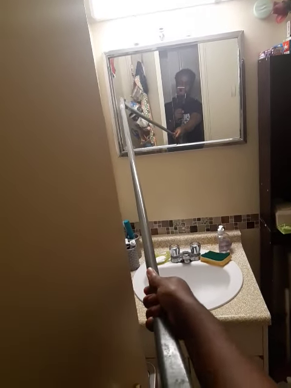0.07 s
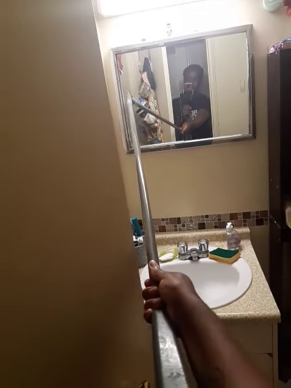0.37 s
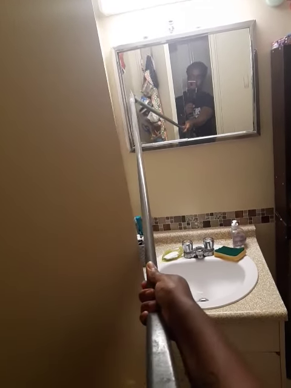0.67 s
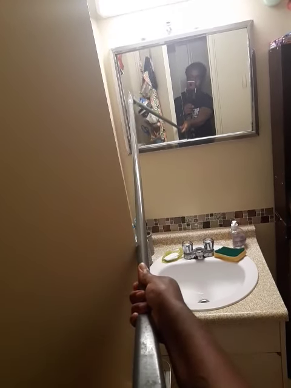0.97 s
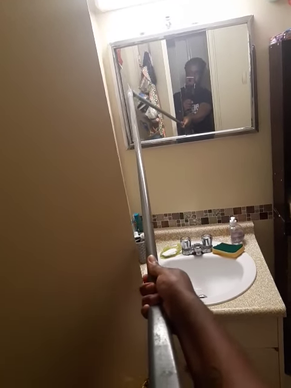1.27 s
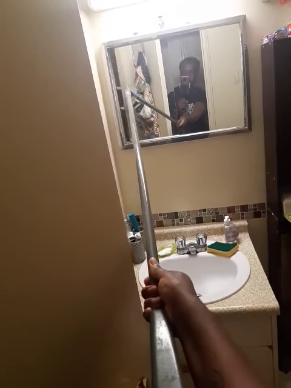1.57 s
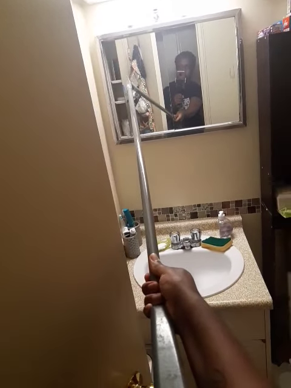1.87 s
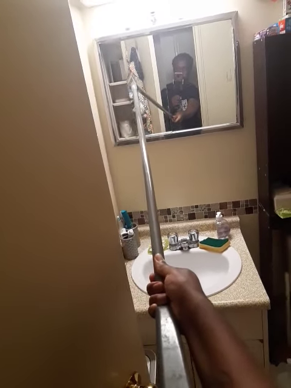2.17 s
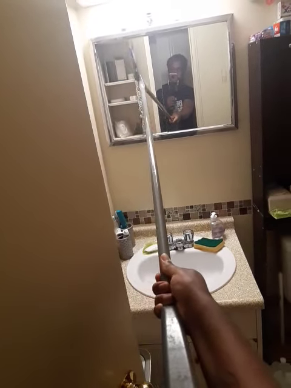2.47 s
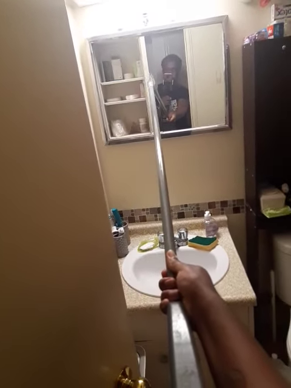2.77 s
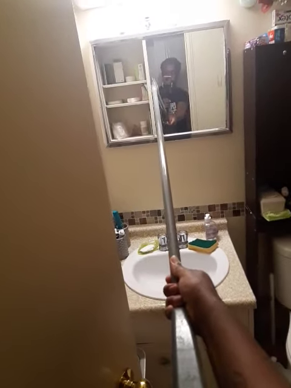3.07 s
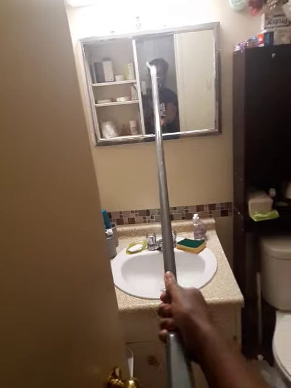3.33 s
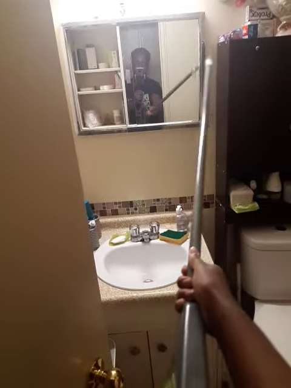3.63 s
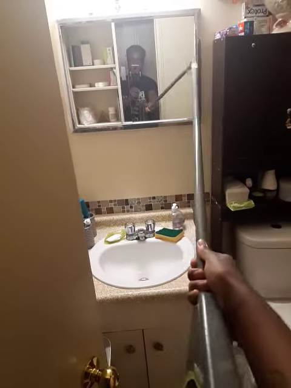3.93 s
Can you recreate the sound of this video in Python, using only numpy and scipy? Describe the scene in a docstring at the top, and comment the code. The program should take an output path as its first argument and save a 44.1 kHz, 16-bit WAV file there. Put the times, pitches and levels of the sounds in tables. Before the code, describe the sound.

A sliding mirror door scrapes softly, bangs at the end, then a pole knocks on wood.

```python
"""A small tiled bathroom, with faint ventilation noise underneath. A long metal pole nudges a mirrored
cabinet door, which thuds, and pushes it along its track: tiny friction slips hiss, scrape and set the
track ringing over a low rumble. The door knocks against its stop and rebounds, its glass buzzing.
The pole swings away, rattling at its loose joint, and knocks on a wooden cupboard. Each knock is
layered from a direct crack, the ring of the struck object and a short room tail."""
import sys
import numpy as np
from scipy import signal
from scipy.fft import rfft, irfft, next_fast_len
from scipy.io import wavfile
from scipy.ndimage import uniform_filter1d, map_coordinates

SR = 44100
rng = np.random.default_rng(int(sys.argv[2]) if len(sys.argv) > 2 else 0)


def wav_record(signal):
    """Record a signal, one row per channel, as 16-bit PCM in the file named by sys.argv[1]."""
    frames = np.transpose(np.atleast_2d(signal))
    bounded = np.clip(frames, -1, 1)
    # unit amplitude maps onto the largest positive 16-bit level
    quanta = np.round(bounded * 32767).astype(np.int16)
    wavfile.write(sys.argv[1], SR, quanta)


N = 176400

# Tiled room's decay (frequency [Hz], t60 [s])
ROOM_T60 = [(80, 0.36), (260, 0.41), (700, 0.29), (1840, 0.21), (4850, 0.2), (12800, 0.099)]
# Stereo image of the room (frequency [Hz], left-right correlation [0-1])
ROOM_CORRELATION = [(60, 0.87), (200, 0.94), (380, 0.72), (700, 0.24), (1300, 0), (15000, 0)]

# Envelopes of the noise layers (time [s], level [dB])
RUMBLE_ENVELOPE = [(0, -65), (.2, -68.5), (.35, -74), (.9, -75), (1.25, -66), (1.5, -72.5), (1.62, -60),
                   (1.82, -72), (1.88, -60.5), (2.0, -69), (2.18, -67), (2.27, -61.5), (2.37, -58.5),
                   (2.5, -62), (2.85, -61), (3.1, -77), (3.5, -53.5), (3.68, -76)]
SCRAPE_ENVELOPE = [(1.12, -90), (1.34, -81.5), (1.352, -87), (1.724, -74.5), (1.924, -79), (2.01, -71),
                   (2.244, -66.5), (2.276, -62.5), (2.33, -64), (2.518, -60.5), (2.556, -63), (2.86, -63),
                   (3.042, -99), (3.06, -94)]
TRACK_ENVELOPE = [(1.3, -89.5), (1.8, -81.5), (2.22, -83.5), (2.3, -76), (2.5, -67), (2.65, -71),
                  (2.84, -67.5), (2.9, -77), (3.0, -95)]
ROLL_ENVELOPE = [(2.12, -82), (2.23, -65.5), (2.32, -64.5), (2.42, -77), (2.6, -73)]
RUB_ENVELOPE = [(2.3, -88), (2.55, -75), (2.66, -66.5), (2.84, -67.5), (2.95, -75.5)]
SCUFF_ENVELOPE = [(3.135, -78), (3.153, -60), (3.165, -47), (3.18, -44), (3.2, -60)]
BUZZ_ENVELOPE = [(3.182, -68), (3.21, -59.5), (3.25, -62.5), (3.31, -81)]

# EQ curves of the noise layers (frequency [Hz], relative level [dB])
VENT_EQ = [(15, -38), (25, -27), (49, -7), (91, -6.5), (144, 1), (169, -14), (221, -10.5), (260, -16.5),
           (349, -22.5), (457, -25), (495, -21), (804, -16), (871, -15), (1850, -31.5), (2120, -28),
           (2360, -32.5), (15500, -33)]
RUMBLE_EQ = [(30, -28), (70, -9.5), (130, -7.5), (175, -6), (215, 4), (260, -4), (330, -12.5), (430, -12.5),
             (600, -26.5), (1500, -59.5)]
HISS_EQ = [(600, -36.5), (1900, -12), (2600, -7), (3500, -1.5), (4300, -1.5), (5600, -5.5), (6400, -11),
           (7200, -31), (11000, -22), (15500, -23)]
SCRAPE_EQ = [(600, -42), (1500, -4), (2300, -14), (2700, -4.5), (3100, 1.5), (3800, 0.5), (4600, -23),
             (5600, -11), (6400, -10), (7200, -18), (15500, -30)]
TRACK_EQ = [(300, -18.5), (450, -2.5), (620, -12), (800, -2), (1100, -4.5), (1300, -7.5), (1600, -9),
            (2000, -6.5), (2300, -8.5), (2800, -13.5), (4000, -37.5)]
ROLL_EQ = [(150, -10), (280, -4.5), (450, -0.5), (560, -13.5), (700, -22), (1500, -33.5)]
SCUFF_EQ = [(50, -25), (150, 1.5), (260, -1.5), (450, -2.5), (800, -11.5), (1500, -13), (2500, -20),
            (5500, -24.5), (7000, -41), (15000, -39)]
BUZZ_EQ = [(3000, -26.5), (7000, -10), (9500, 1), (15500, -2)]
# EQ curves of the hits (frequency [Hz], relative level [dB])
NUDGE_EQ = [(30, -32), (55, -27), (80, -5), (110, 1), (150, -4), (250, -2), (310, -12.5), (450, -12),
            (620, -21), (1200, -34.5), (1800, -33.5), (3000, -40), (5000, -43), (7000, -62), (15000, -54)]
STOP_EQ = [(24, -84.5), (40, -64), (132, -6), (170, -16.5), (280, -2.5), (325, -9.5), (417, -1), (621, -4),
           (881, -3), (973, -10), (1100, -2.5), (1600, -2), (1820, -9), (4800, -15.5), (6160, -15.5),
           (6810, -39.5), (15500, -45)]
RATTLE_EQ = [(35, -56), (60, -30), (135, 1), (179, -11), (285, 1), (351, -10.5), (385, -10.5), (599, -15.5),
             (792, -9.5), (976, -22.5), (1120, -13), (2150, -29.5), (3840, -31), (7030, -50.5),
             (15500, -65.5)]
CUPBOARD_EQ = [(24, -69), (40, -56), (108, -11.5), (139, -12.5), (229, -2.5), (350, -4), (427, 0.5),
               (535, -9.5), (722, -2), (859, -14), (1050, -10.5), (1680, -19), (2570, -19.5), (3390, -23.5),
               (4570, -18.5), (7340, -38), (15500, -36.5)]

# Resonances driven by friction (frequency [Hz], bandwidth [Hz], relative level [dB])
TRACK_PEAKS = [(1560, 50, 1), (1896, 40, 1.5), (2637, 14, 2), (3045, 26, 0.5), (3680, 32, -3.5)]
RUB_PEAKS = [(783, 40, 0), (865, 30, -5)]
# Ringing modes of the struck objects (frequency [Hz], relative level [dB], t60 [s])
PANEL_MODES = [(80, -6, 0.48), (148.5, -3.5, 0.36), (214.5, -9.5, 0.41), (241.6, 2.5, .33),
               (301, -19.5, 0.48), (377.7, -12, 0.32), (460, -27, 0.3), (497, -20.5, 0.46),
               (1746, -30.5, 0.26), (2750, -36, .12), (4080, -36, .15)]
STOP_MODES = [(404, 1.5, .17), (417, 7, 0.083), (432.5, -2.5, 0.13), (663, -4, 0.23), (845, -1, .2),
              (895, -3, 0.31), (1046, -5, 0.19), (1122, 7, 0.17), (1262, 1, 0.19), (1270, -6.5, 0.13),
              (1536, 1, .16), (1605, -13.5, .15), (1716, 1, .15), (1806, -2, 0.24), (2003, 2.5, .15),
              (2670, -5, 0.19), (4650, -6.5, 0.21)]
POLE_MODES = [(123.2, 1, 1), (151.6, 1.5, 0.49), (246, -4, 0.49), (492.7, -1, 0.61), (842, 4, 0.16),
              (1050, -6, 0.11), (1620, 4.5, 0.22), (3500, -6, .12)]
TUBE_MODES = [(3795, -1, 0.22), (3900, -2, 0.22), (3980, -8, .14)]
CUPBOARD_MODES = [(166.6, -7, 0.35), (234.2, -6.5, 0.37), (321.7, 0, 0.15), (374.6, 7, .12),
                  (404.7, 6.5, 0.14), (570, -0.5, 0.29), (713, -1.5, 0.32), (779, -5, 0.16), (1024, -7, .2),
                  (1054, -4, 0.21), (1448, -11, 0.23), (2400, -3, 0.095), (4550, -4, 0.099)]

# Panning of the hits (frequency [Hz], left minus right [dB])
CENTRE_PAN = [(100, -.5), (10000, .5)]
STOP_PAN = [(100, 2.5), (200, -3.5), (380, -1), (700, -4), (1300, -2.5), (2400, -0.5), (4400, 0.5),
            (8000, 3), (15000, 3)]
CUPBOARD_PAN = [(100, -1), (200, 0.5), (380, -2.5), (700, 1.5), (1300, -0.5), (4400, 2), (8000, 5.5),
                (15000, -0.5)]

# The door hits its stop and rebounds (time [s], knock level [dB], clack level [dB])
STOP_HITS = [(3.1816, -30, -12), (3.2116, -44, -20)]
# The pole's joint rattles (time [s], level [dB], tilt towards the bass [dB/octave])
RATTLES = [(3.399, -41, -4.5), (3.7, -50, -3.5), (3.937, -53, -2.5)]

HIT_GAIN = np.sqrt(SR / 20)  # brings energy 1 to that of 50 ms at rms 1


def amp(db):
    return 10 ** (np.asarray(db) / 20)


def unit_rms(x):
    return x / np.sqrt(np.mean(x ** 2) + 1e-20)


def curve_at(points, hz):
    """Read a curve on a log frequency axis."""
    knots_hz, values = np.transpose(points)
    return np.interp(np.log(hz + 1), np.log(knots_hz + 1), values)


def fader(envelope):
    """Gain per sample, silent outside the envelope."""
    return amp(np.interp(np.arange(N) / SR, *np.transpose(envelope), left=-120, right=-120))


def wobble(rate):
    """Smooth random modulation, rate knots a second."""
    return map_coordinates(rng.standard_normal(int(N * rate / SR) + 4), [np.arange(N) * rate / SR])


def filtered(x, response):
    """Shape x with a frequency response."""
    n = x.shape[-1]
    padded = next_fast_len(n + SR // 2)
    return irfft(rfft(x, padded) * response(np.fft.rfftfreq(padded, 1 / SR)), padded)[..., :n]


def width_angle(hz):
    """The room's stereo width as a mid-side angle in radians."""
    return np.arccos(np.clip(curve_at(ROOM_CORRELATION, hz), -1, 1)) / 2


def diffuse(pair):
    """Two unrelated signals become a room field: narrow in the lows, wide in the highs."""
    mid, side = filtered(pair, lambda hz: np.array([np.cos(width_angle(hz)), np.sin(width_angle(hz))]))
    return np.array([mid + side, mid - side])


def noise_bed(eq):
    """Coloured stereo noise, rms 1."""
    return unit_rms(diffuse(filtered(rng.standard_normal((2, N)), lambda hz: amp(curve_at(eq, hz)))))


def contact_pulse(eq, tilt_db, size=4096):
    """A minimum-phase transient with the given EQ, energy 1."""
    hz = np.fft.rfftfreq(size, 1 / SR)
    cepstrum = irfft(np.log(amp(curve_at(eq, hz) - tilt_db * np.log2(hz / 1000 + .1))))
    cepstrum[1:size // 2] *= 2
    cepstrum[size // 2 + 1:] = 0
    pulse = irfft(np.exp(rfft(cepstrum)))
    return pulse / np.linalg.norm(pulse)


def room_tail(build_s=.0063, smooth_hz=45):
    """A fresh reverb tail off the tiles, even in colour, energy about 1 a channel."""
    hz, t, bands = signal.stft(rng.standard_normal((2, SR * 3 // 4)), SR, nperseg=256)
    decay = amp(-60 * t / curve_at(ROOM_T60, hz)[:, None])
    tail = signal.istft(bands * decay, SR, nperseg=256)[1]
    tail *= 1 - np.exp(-np.arange(tail.shape[1]) / SR / build_s)
    spectrum = rfft(tail, SR)
    colour = np.sqrt(np.abs(uniform_filter1d(np.abs(spectrum) ** 2, smooth_hz)) + 1e-12)
    return diffuse(irfft(spectrum / colour)[:, :SR * 2 // 3])


def ring(modes, samples, attack_s=.0013):
    """Decaying modes, spread in stereo by the room, energy about 1 a channel."""
    t = np.arange(samples) / SR
    hz, db, t60 = np.transpose(modes)[:, :, None]
    phase, lean, jitter_db = rng.standard_normal((len(modes), 3)).T[:, :, None]
    spread = np.sign(lean) * width_angle(hz)
    fade = amp(db + jitter_db - 60 * t / t60) * (1 - np.exp(-t / attack_s))
    angle = 2 * np.pi * (hz * t + phase)
    tone = np.array([(fade * np.sin(angle + side * spread)).sum(0) for side in (1, -1)])
    return tone * np.sqrt(2) / np.linalg.norm(tone)


def crack(pulse, t60_s=.025, size=1024):
    """The direct sound of a contact: its pulse roughened by a short noise burst."""
    burst = rng.standard_normal((2, size)) * amp(-60 * np.arange(size) / SR / t60_s)
    burst /= np.linalg.norm(burst, axis=1, keepdims=True)
    return signal.fftconvolve(pulse[None], burst, axes=1)


def knock(eq, modes, pan, ring_db, crack_db, low_cut_hz, tilt_db=0):
    """One hit in three layers: room tail, the object's ring and a high-passed crack."""
    pulse = contact_pulse(eq, tilt_db)
    hit = signal.fftconvolve(pulse[None], room_tail(), axes=1)
    hit += amp(ring_db) * ring(modes, hit.shape[1])
    direct = signal.sosfilt(signal.butter(2, low_cut_hz, "high", fs=SR, output="sos"), crack(pulse))
    hit[:, :direct.shape[1]] += amp(crack_db) * direct
    return HIT_GAIN * filtered(hit, lambda hz: amp(curve_at(pan, hz) * np.array([[.5], [-.5]])))


def friction(eq, grain_db=6.5, grains_per_s=260, dry_db=-13):
    """Tiny uneven slips at one spot, heard through the room, rms 1."""
    slips = rng.standard_normal(N) * amp(grain_db * np.tanh(wobble(grains_per_s)))
    wet = signal.fftconvolve(slips[None], room_tail(), axes=1)[:, :N]
    return unit_rms(filtered(wet + amp(dry_db) * slips, lambda hz: amp(curve_at(eq, hz))))


def resonant_noise(peaks):
    """Friction noise through narrow resonances of alternating polarity, rms 1."""
    def response(hz):
        return sum((-1) ** k * amp(db) * 1j * hz * width / (centre ** 2 - hz ** 2 + 1j * hz * width)
                   for k, (centre, width, db) in enumerate(peaks))
    return unit_rms(diffuse(filtered(rng.standard_normal((2, N)), response)))


def cue(time_s, sound):
    """A full-length stereo track with the sound placed at time_s."""
    out = np.zeros((2, N))
    start = round(time_s * SR)
    out[:, start:start + sound.shape[1]] = sound[:, :N - start]
    return out


def ventilation():
    """A faint, steady bed of moving air."""
    return amp(-67) * noise_bed(VENT_EQ)


def handling_rumble():
    """Low end from the loose door and the pole being handled."""
    return amp(-1) * fader(RUMBLE_ENVELOPE) * noise_bed(RUMBLE_EQ)


def mirror_nudge(time_s=.9355, thud_delay_s=.021):
    """The pole's tip lands on the mirror; the panel thuds back against its track and booms."""
    touch = knock(NUDGE_EQ, PANEL_MODES, CENTRE_PAN, ring_db=2.5, crack_db=-6.5, low_cut_hz=200)
    thud = knock(NUDGE_EQ, PANEL_MODES, CENTRE_PAN, ring_db=9.5, crack_db=-20, low_cut_hz=100)
    return cue(time_s, amp(-43) * touch) + cue(time_s + thud_delay_s, amp(-44.5) * thud)


def door_scrape(full_effort_db=-62.5, scrape_exponent=2.33):
    """A light push hisses thinly; the deeper scrape swells faster with effort."""
    effort = fader(SCRAPE_ENVELOPE) * amp(.81 * wobble(30.11) - full_effort_db)
    hiss = amp(1.5) * effort * friction(HISS_EQ)
    scrape = amp(-2.5 + 1.5 * wobble(16)) * effort ** scrape_exponent * friction(SCRAPE_EQ)
    return amp(full_effort_db) * (hiss + scrape)


def track_ring():
    """Friction excites the track: a broad midrange body and narrow peaks, fluttering together."""
    flutter = amp(1.6 * wobble(18))
    body = amp(2.5) * friction(TRACK_EQ)
    peaks = amp(2) * resonant_noise(TRACK_PEAKS)
    return fader(TRACK_ENVELOPE) * flutter * (body + peaks)


def runner_roll():
    """The runners rumble over a rough stretch of track."""
    return fader(ROLL_ENVELOPE) * noise_bed(ROLL_EQ)


def door_rub():
    """Near the end of its travel the door rubs up a low tone."""
    return fader(RUB_ENVELOPE) * resonant_noise(RUB_PEAKS)


def door_stop():
    """The door's edge scuffs, then it knocks hard at the end of the track and rebounds."""
    out = fader(SCUFF_ENVELOPE) * noise_bed(SCUFF_EQ)
    for time_s, knock_db, clack_db in STOP_HITS:
        hit = knock(STOP_EQ, STOP_MODES, STOP_PAN, ring_db=-.5, crack_db=-6, low_cut_hz=300)
        out += cue(time_s, amp(knock_db) * hit)
        out += cue(time_s, amp(clack_db) * frame_clack())
    return out


def frame_clack(hz=1420, t60_s=.009, rise_s=.0006, pan_db=-3.5, left_lag_s=.0001):
    """The frame's heavily damped first swing, reaching the right ear first."""
    t = np.maximum(np.arange(SR // 20) / SR - [[left_lag_s], [0]], 0)
    attack = 1 - np.exp(-(t / rise_s) ** 2)
    swing = np.sin(2 * np.pi * hz * t) * attack * amp(-60 * t / t60_s)
    return swing / np.abs(swing).max() * amp([[pan_db / 2], [-pan_db / 2]])


def glass_buzz():
    """A brief top-end sizzle as the glass shakes in its frame after the stop."""
    return fader(BUZZ_ENVELOPE) * noise_bed(BUZZ_EQ)


def pole_rattle(gap_s=.011, loss_db=5):
    """Each swing pings the tube and makes the loose joint chatter in three fading contacts."""
    out = np.zeros((2, N))
    for time_s, db, tilt_db in RATTLES:
        out += cue(time_s, amp(db - 12) * HIT_GAIN * ring(TUBE_MODES, SR // 2))
        for k in range(3):
            contact = knock(RATTLE_EQ, POLE_MODES, CENTRE_PAN,
                            ring_db=-5, crack_db=-16, low_cut_hz=1490, tilt_db=tilt_db)
            out += cue(time_s + k * gap_s, amp(db - 4.5 - k * loss_db) * contact)
    return out


def cupboard_knock(time_s=3.7408):
    """The pole strikes the tall wooden cupboard: a bright crack and a hollow boom."""
    hit = knock(CUPBOARD_EQ, CUPBOARD_MODES, CUPBOARD_PAN, ring_db=-1.5, crack_db=-2, low_cut_hz=895)
    return cue(time_s, amp(-28.5) * hit)


def scene():
    """The mix: background beds, the door's travel, then the pole swinging away."""
    beds = ventilation() + handling_rumble()
    push = mirror_nudge() + door_scrape() + track_ring() + runner_roll() + door_rub()
    return beds + push + door_stop() + glass_buzz() + pole_rattle() + cupboard_knock()


def record(dry):
    """A brick-wall high cut on the mix."""
    return filtered(dry, lambda hz: hz < 15750)


dry = scene()
out = record(dry)
wav_record(out)
```